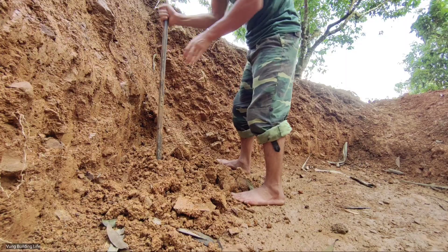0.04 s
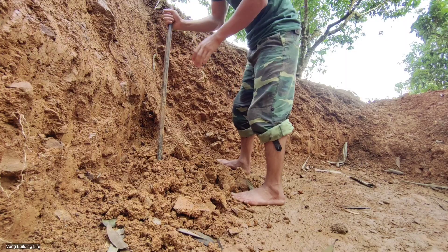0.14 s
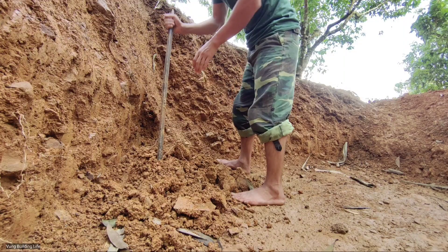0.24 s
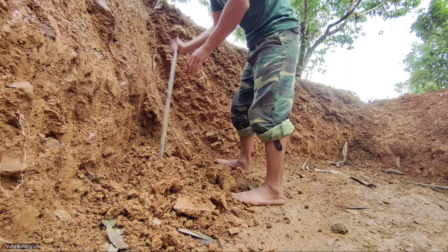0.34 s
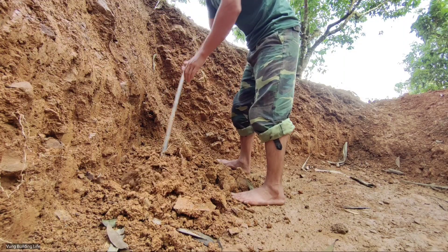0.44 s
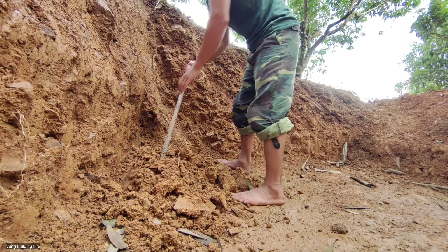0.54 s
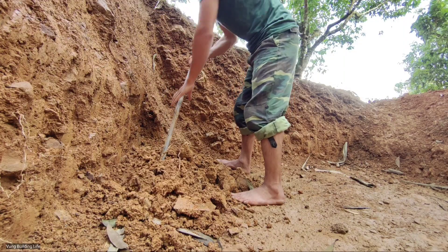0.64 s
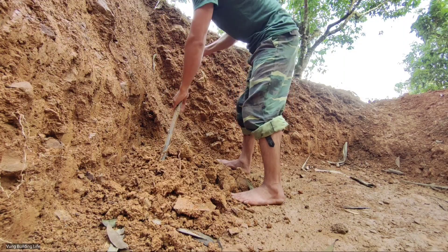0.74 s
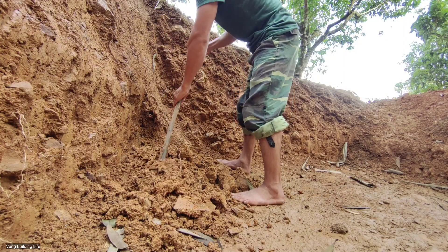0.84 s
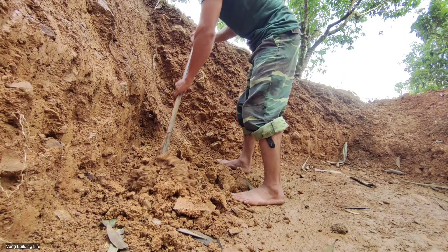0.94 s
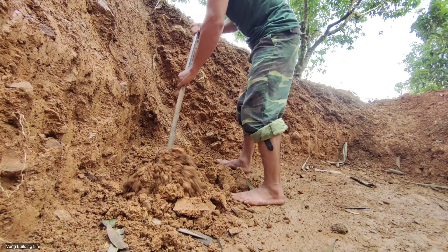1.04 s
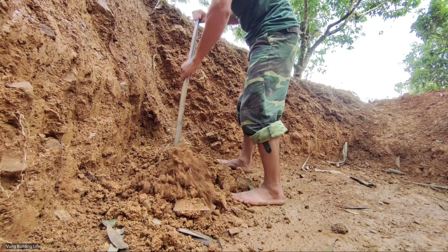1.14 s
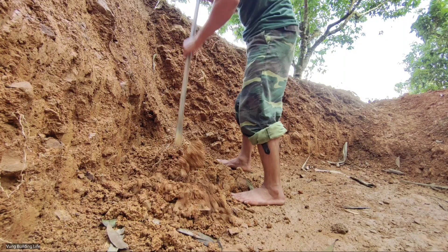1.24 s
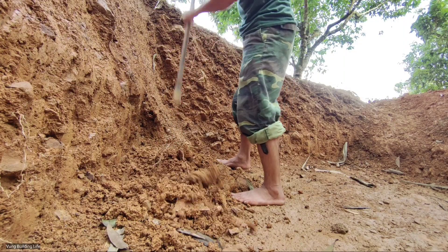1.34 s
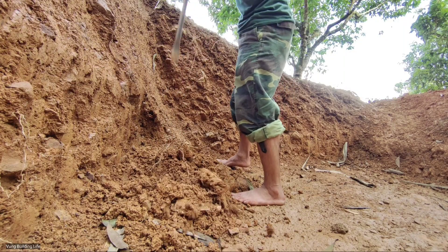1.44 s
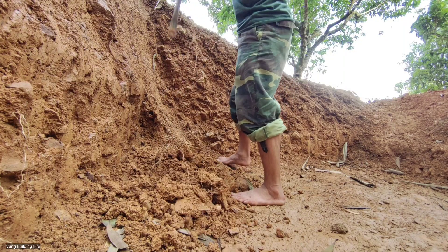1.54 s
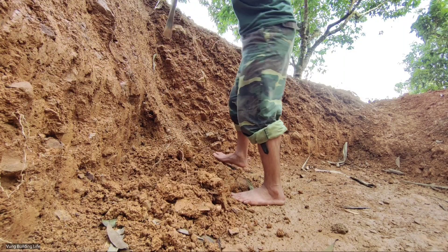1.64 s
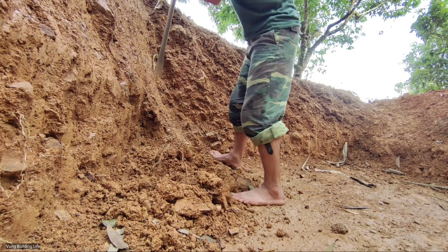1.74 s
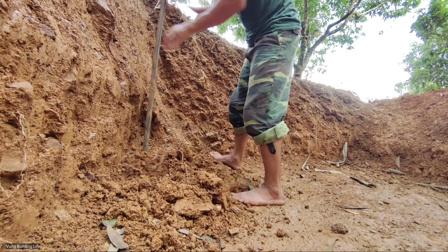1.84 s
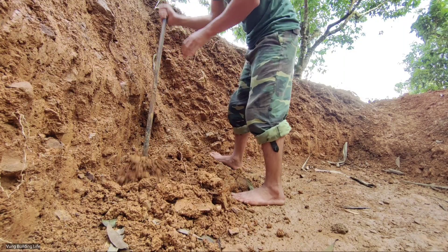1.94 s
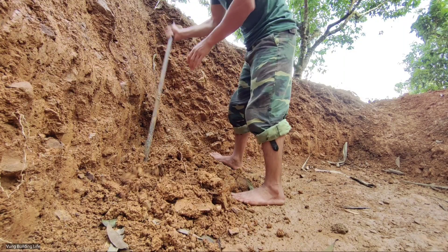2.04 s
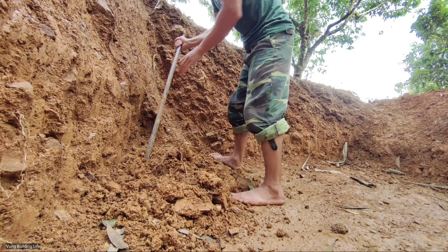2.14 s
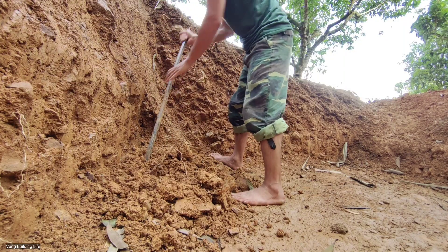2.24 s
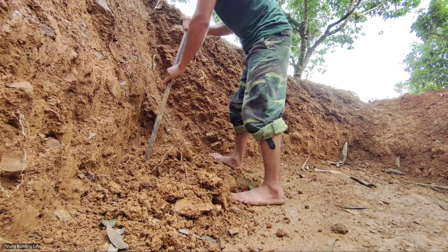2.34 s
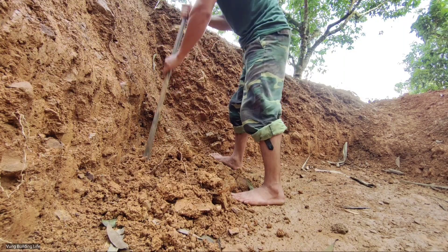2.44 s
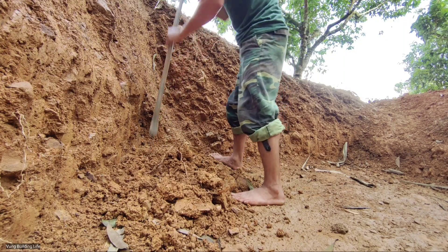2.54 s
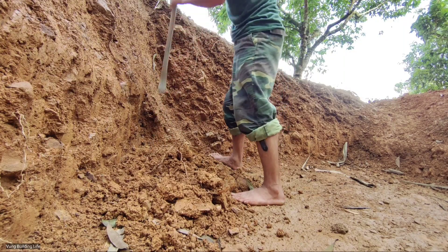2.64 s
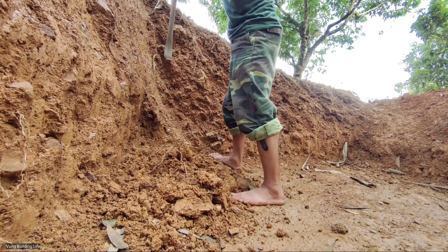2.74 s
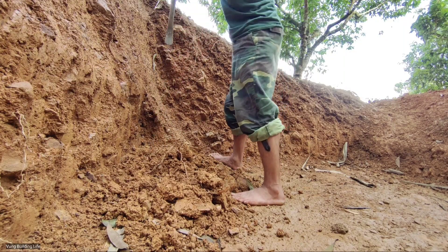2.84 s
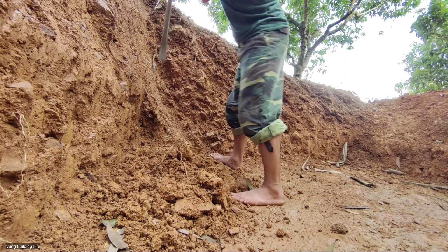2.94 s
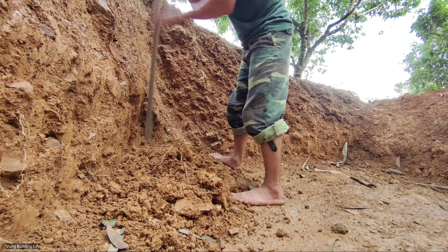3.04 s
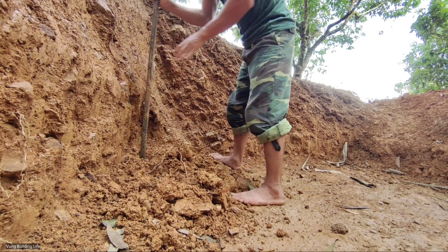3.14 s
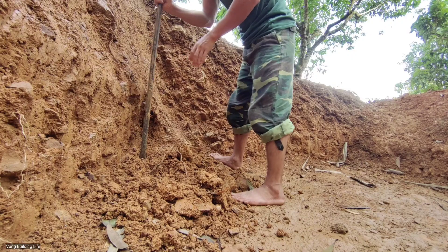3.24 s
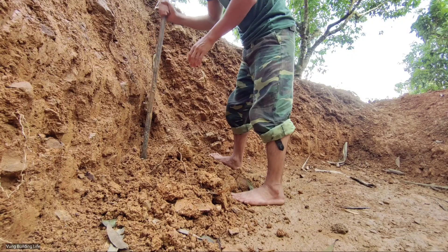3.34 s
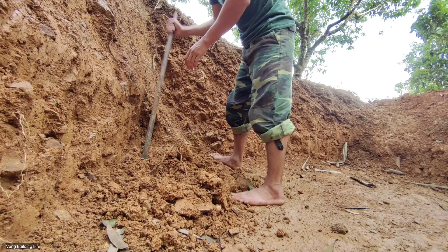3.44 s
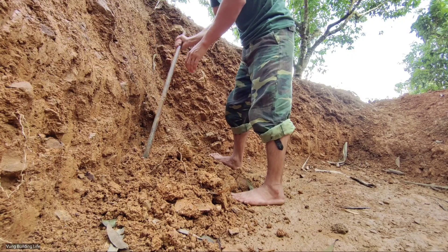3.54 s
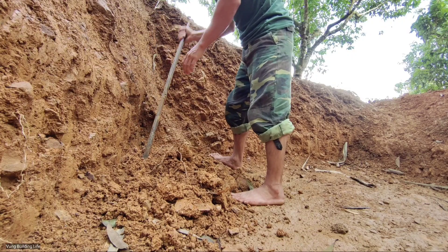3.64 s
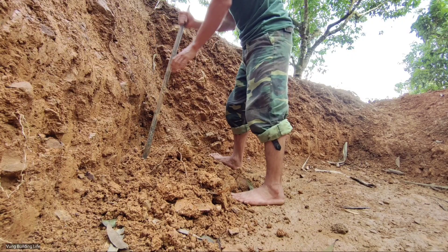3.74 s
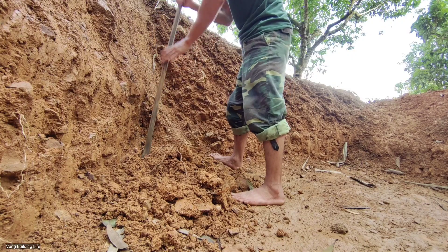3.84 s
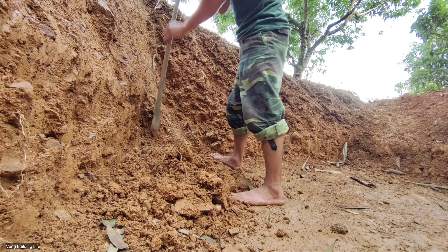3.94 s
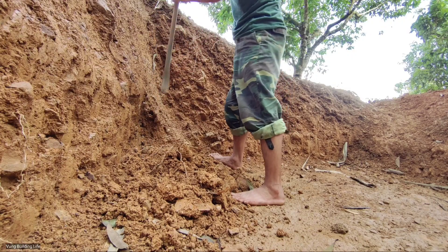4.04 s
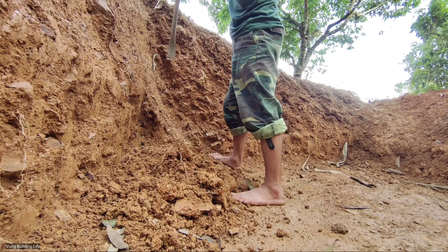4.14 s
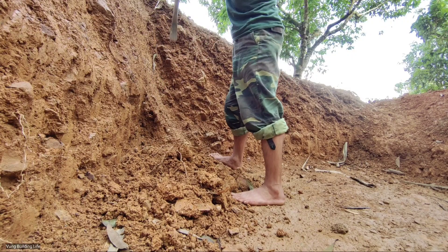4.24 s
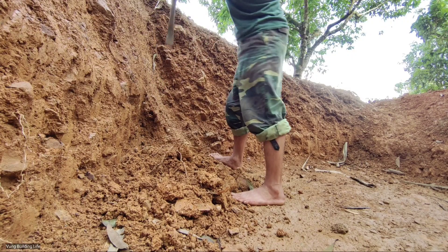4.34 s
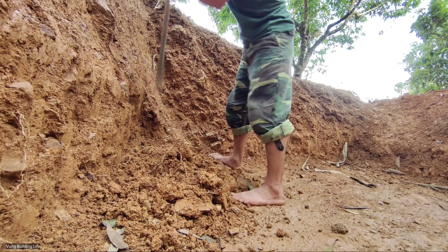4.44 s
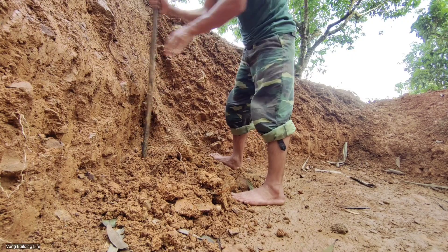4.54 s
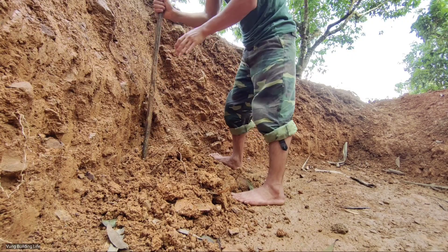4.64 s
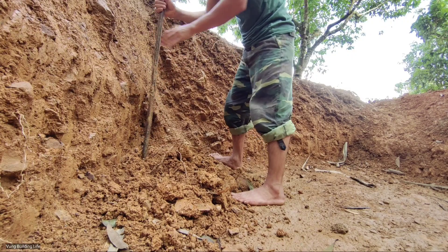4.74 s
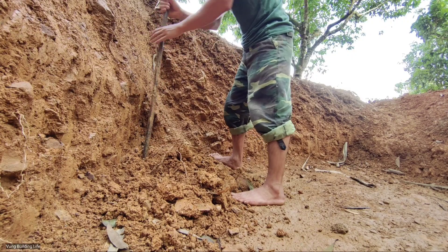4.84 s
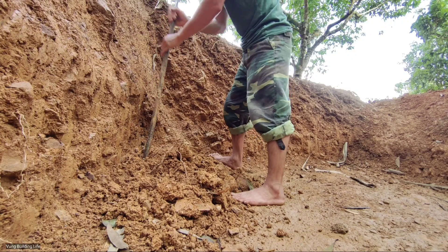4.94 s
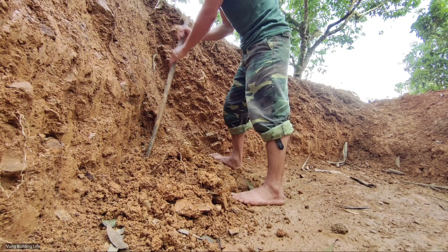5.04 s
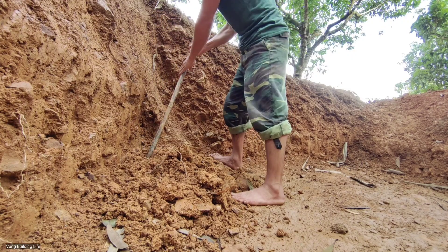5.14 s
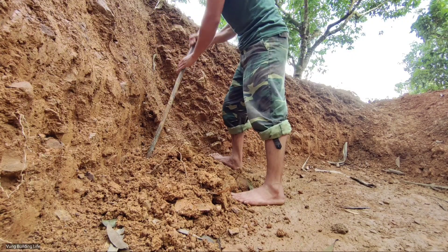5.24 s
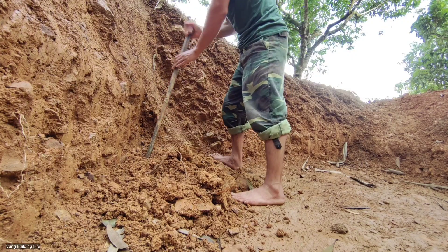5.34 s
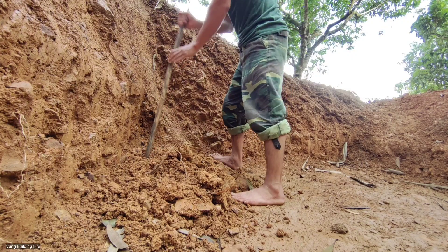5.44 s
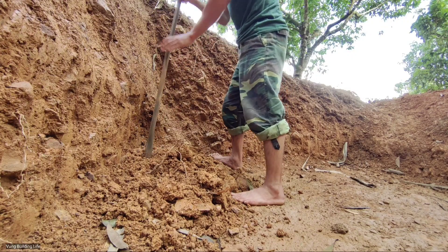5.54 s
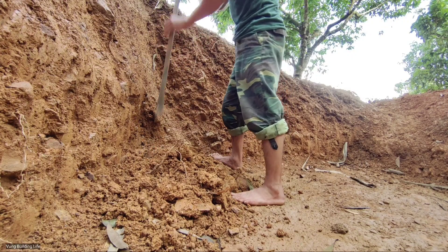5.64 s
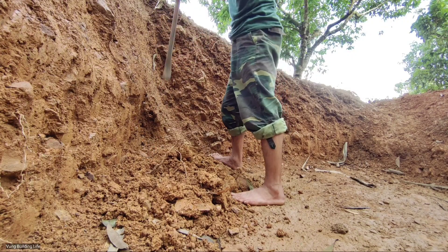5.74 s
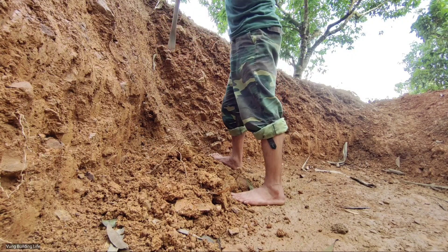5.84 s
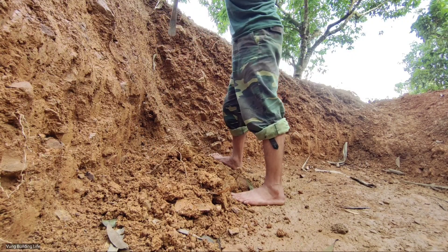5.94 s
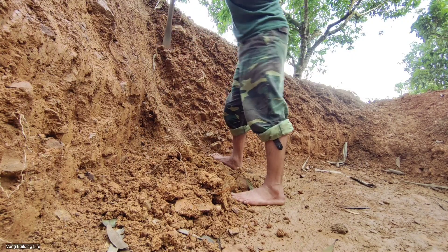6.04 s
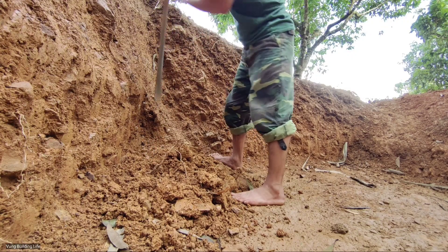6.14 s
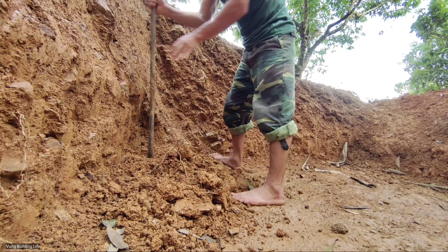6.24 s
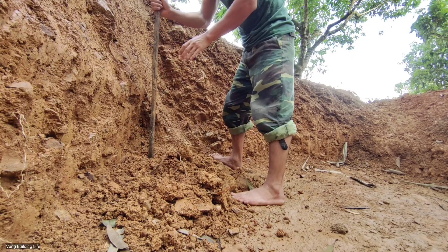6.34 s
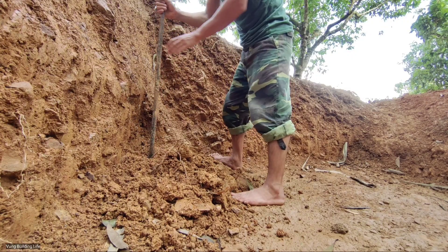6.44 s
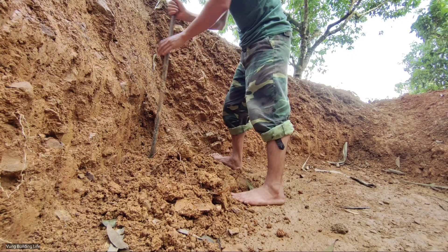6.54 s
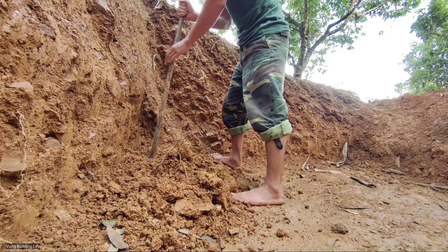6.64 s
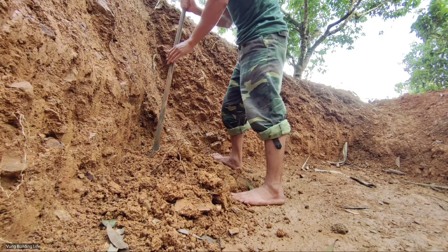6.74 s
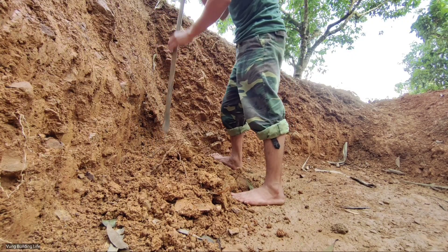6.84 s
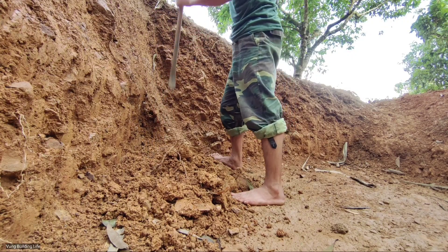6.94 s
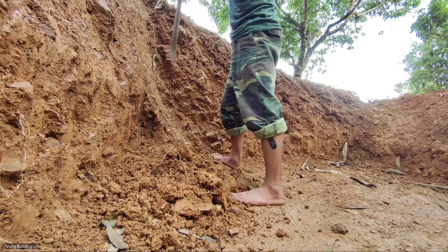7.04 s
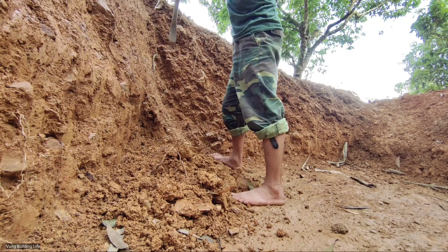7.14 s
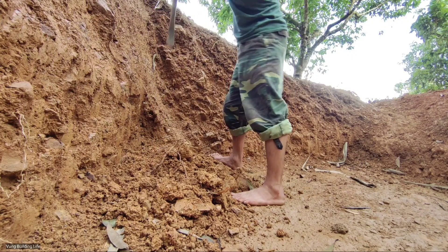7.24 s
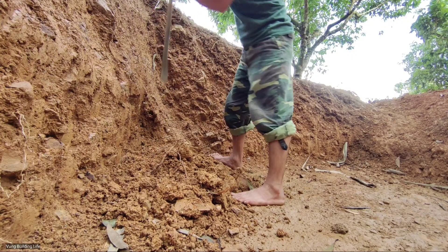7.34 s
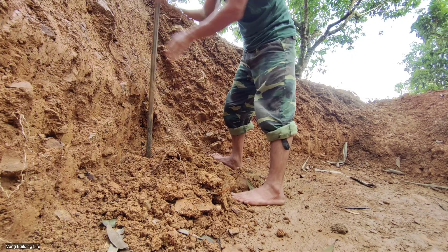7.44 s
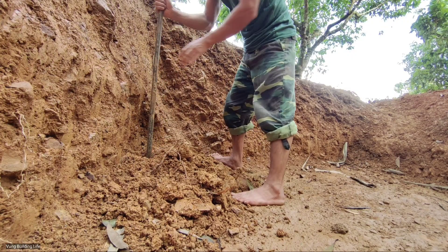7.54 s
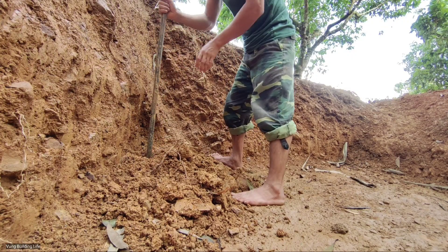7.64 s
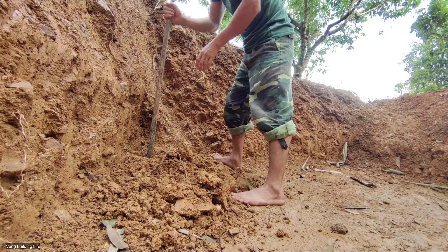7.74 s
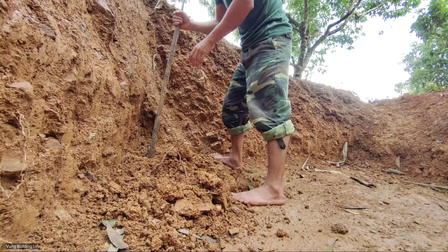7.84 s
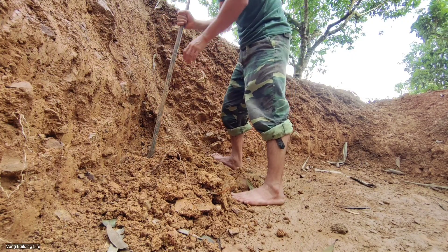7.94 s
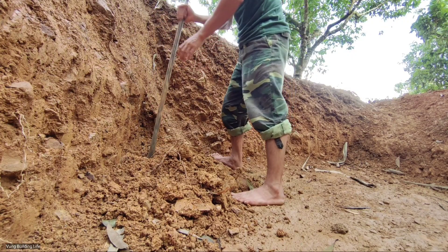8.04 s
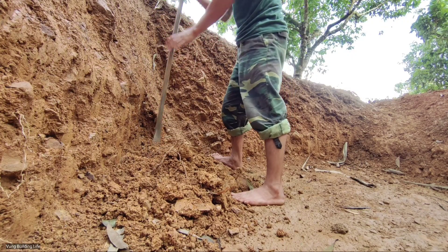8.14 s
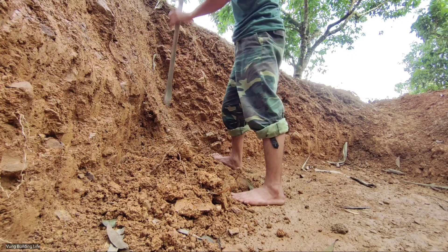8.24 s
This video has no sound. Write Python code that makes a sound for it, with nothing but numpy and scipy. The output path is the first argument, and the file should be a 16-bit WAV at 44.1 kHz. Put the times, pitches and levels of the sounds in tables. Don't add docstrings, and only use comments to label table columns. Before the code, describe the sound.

Close, dry strikes of a metal bar into an earth bank, followed by scraping, crumbling soil and pebble ticks, with distant insects outdoors.

```python
import sys
import numpy as np
from scipy import signal
from scipy.fft import rfft, irfft, next_fast_len
from scipy.io import wavfile
from scipy.ndimage import uniform_filter1d, map_coordinates

SR = 44100
rng = np.random.default_rng(int(sys.argv[2]) if len(sys.argv) > 2 else 0)


def to_linear_factor(level_db):
    exponent = np.asarray(level_db, float) / 20
    return 10 ** exponent


def wav_out(sig):
    wavfile.write(sys.argv[1], SR, np.round(np.clip(np.atleast_2d(sig).T, -1, 1) * 32767).astype(np.int16))


N = 364707
LAG, SHAFT_LAG = 8, 3


def unit(x):
    return x / np.sqrt(np.mean(x ** 2) + 1e-20)


def along(points, hz):
    f, v = np.transpose(points)
    return np.interp(np.log(hz + 1), np.log(f + 1), v)


def curves(rows):
    s, *cols = np.transpose(rows)
    return [np.interp(np.arange(N) / SR, s, c) for c in cols]


def filtered(x, response):
    n = x.shape[-1]
    m = next_fast_len(2 * (n // 2) + 4096, real=True) // 2 * 2
    return irfft(rfft(x, m) * response(np.fft.rfftfreq(m, 1 / SR)), m)[..., :n]


def causal(level_db):
    c = irfft(np.log(np.maximum(to_linear_factor(level_db), 1e-4)))
    half = len(c) // 2
    c[1:half] *= 2
    c[half + 1:] = 0
    return np.exp(rfft(c))


def resonances(modes):
    def response(f):
        total = 0
        for k, (centre, width, db) in enumerate(modes):
            damping = 1j * f * width
            total = total + (-1) ** k * to_linear_factor(db) * damping / (centre * centre - f * f + damping)
        return total
    return response


def bell_db(hz, centre_hz, width_oct):
    return -6 * (np.log2((hz + 1) / centre_hz) / width_oct) ** 2


def add(track, s, sound, lean_db, lag=LAG):
    for ch, (late, gain) in enumerate([(lag, to_linear_factor(lean_db / 2)), (0, to_linear_factor(-lean_db / 2))]):
        part = track[ch, round(s * SR) + late:][:len(sound)]
        part += gain * sound[:len(part)]


def strokes(s, hold_s, gain, swell_s, fade_s):
    t = np.arange(N // 128 + 2)[:, None] * 128 / SR
    before = (s - t) / np.maximum(swell_s, .003)
    after = (t - s - hold_s) / np.maximum(fade_s, .01)
    shape_db = -20 * np.maximum(before, after).clip(0, 9)
    power = ((gain * to_linear_factor(shape_db)) ** 2).sum(axis=1)
    return np.interp(np.arange(N) / SR, t[:, 0], np.sqrt(power))


def rush(spectrum, alike, patchy_db):
    z = signal.stft(rng.standard_normal((2, N)), nperseg=512)[2]
    field = uniform_filter1d(rng.standard_normal(z.shape[1:]), size=2, axis=0)
    field = uniform_filter1d(field, size=14, axis=1)
    pair = signal.istft(z * to_linear_factor(patchy_db * unit(field)), nperseg=512)[1][:, :N]

    def response(hz):
        turn = np.arccos(np.clip(along(alike, hz), -1, 1)) / 2
        return to_linear_factor(along(spectrum, hz)) * [np.cos(turn), np.sin(turn)]
    mid, side = filtered(pair, response)
    return unit(np.array([mid + side, mid - side]))


def burst(t60, spiky, colour_db, rise_s=1e-4, size=SR // 6):
    t = np.arange(size) / SR
    raw = rng.standard_normal(len(t)) * np.exp(spiky * rng.standard_normal(len(t)))
    raw *= to_linear_factor(-60 * t / max(t60, .004)) * (1 - np.exp(-t / rise_s))
    raw *= np.minimum(1, 2 - 2 * t / t[-1])
    out = filtered(raw, lambda hz: causal(colour_db(hz)))
    return out / np.abs(out).max()


def crumbs(count, spread_db, scatter, clump_db, lag=LAG):
    clumps_per_s = 45
    draw = rng.random((count, 4))
    at = (draw[:, 0] * (N - 64)).astype(int) + 32
    field = rng.standard_normal(N * clumps_per_s // SR + 4)
    clump = map_coordinates(field, [at * clumps_per_s / SR])
    size = to_linear_factor(-spread_db * np.log(draw[:, 1] + 4e-3) + clump_db * clump) * np.sign(draw[:, 2] - .5)
    late = np.round(lag + scatter * (draw[:, 3] - .5)).astype(int)
    return unit(np.array([np.bincount(at + late, size, N), np.bincount(at, size, N)]))


# t/s, insects/dB, breeze/dB
AIR_LEVELS = [
    (0.0, -68, -74.5),
    (0.94, -66, -74),
    (8.27, -67, -73.5),
]
# f/Hz, density/dB per Hz
INSECT_SPECTRUM = [(2060, -45.5), (3500, -9), (4220, -6), (4520, 6.5), (4800, 4.5), (5150, 7), (5920, -2),
                   (6550, -7), (7600, -41.5), (9880, -46.5), (16700, -120)]
RUMBLE_SPECTRUM = [(15, -30.5), (25, -3.5), (81, 3.5), (184, -8.5), (252, -1), (502, -18), (657, -12.5),
                   (900, -34.5), (1170, -46.5), (1980, -120)]
HISS_SPECTRUM = [(500, -58), (800, 3.5), (2500, -2.5), (4000, -7.5), (7700, -4.5), (11500, -8.5),
                 (15000, -4)]


def outdoors():
    insects_db, rumble_db = curves(AIR_LEVELS)
    chorus = to_linear_factor(insects_db + 4.5) * rush(INSECT_SPECTRUM, [(5000, 0.098)], patchy_db=4.5)
    rumble = to_linear_factor(rumble_db + 7.5) * rush(RUMBLE_SPECTRUM, [(60, 1.0), (290, 0.73), (800, .2)], patchy_db=5.0)
    hiss = to_linear_factor(-72.5) * rush(HISS_SPECTRUM, [(1000, 0.16)], patchy_db=4.0)
    return chorus + rumble + hiss


# f/Hz, width/Hz, level/dB
SINGERS = [
    (4600, 120, -78),
    (5190, 54, -71.5),
]


def singers():
    t, out = np.arange(N) / SR, 0

    def drift(rate_hz):
        return np.interp(t * rate_hz, np.arange(2000), rng.standard_normal(2000))
    for hz, width_hz, db in SINGERS:
        swell = to_linear_factor(db + 2.5 * drift(6.4))
        sine, cosine = np.sin(2 * np.pi * hz * t), np.cos(2 * np.pi * hz * t)
        out = out + swell * np.array([drift(width_hz) * sine + drift(width_hz) * cosine for _ in range(2)])
    return out


# f/Hz, level/dB, t60/s
PLANE_A = [(915, -8, .4), (1297, -8, .33), (1742, -6, .3), (2261, -3, .24), (2855, 0, .2), (3500, -2, .2),
           (4202, -3, .19), (4969, -5, .19), (5768, -5, .2), (6643, -7, .22), (7560, -14, .18),
           (8570, -12, .2), (9530, -14, .2), (10600, -16, .2)]
PLANE_B = [(969, -4, .45), (1416, -4, .4), (1943, -6, .3), (2535, 0, .26), (3198, -2, .25), (3957, -2, .24),
           (4770, -5, .25), (5642, -6, .25)]
OVERTONES = [(11670, -16, .2), (12800, -18, .2), (13810, -22, .2), (15080, -12, .2)]
# from/s, to/s
SEATED_SPANS = [
    (0, .1),
    (6.2, 6.5),
]
# t/s, level/dB, favoured f/Hz, second-plane share/0-1, t60/s
JOLTS = [(0.0005, -20.5, 5760, 0.5, 0.044), (.012, -26, 5900, 0.7, 0.1), (4.578, -39, 3850, .95, 0.081),
         (4.6, -38, 3020, 0.9, 0.063), (4.624, -40, 3700, 0.9, 0.08), (4.66, -41.5, 3600, 0.76, 0.1),
         (4.955, -55, 3900, 0.73, 0.16), (5.03, -46, 5570, 0.56, 0.25), (5.075, -43, 6600, 0.7, 0.14),
         (5.21, -49, 4180, 0.5, 0.37), (5.275, -47, 6700, 0.9, 0.5), (5.335, -46.5, 6550, 0.45, 0.21),
         (6.2048, -14, 6590, 0.2, 0.03), (6.233, -31, 4250, 0.3, 0.066), (6.311, -32.5, 6640, 0.37, 0.076),
         (6.331, -43, 4300, 0.5, 0.065), (6.352, -35, 4900, 0.44, 0.11), (6.371, -36, 6600, 0.1, 0.054),
         (6.4, -40, 5870, .05, 0.092), (6.414, -36.5, 5550, 0, 0.041), (6.452, -39, 6540, 0.18, 0.084),
         (6.479, -36.5, 6500, 0.4, 0.058), (6.504, -40.5, 6600, .05, 0.051),
         (6.521, -34.5, 6500, .05, 0.061), (6.546, -33.5, 6800, 0, 0.059), (6.586, -36, 6600, 0.2, 0.035),
         (6.613, -31.5, 6800, 0.1, 0.047), (6.677, -47, 6800, 0.44, .3), (8.019, -41, 5700, 0.15, 0.25),
         (8.022, -43.5, 4200, .02, 0.26)]


def jolts():
    out, t = np.zeros((2, N)), np.arange(SR // 6) / SR
    first = PLANE_A[3:] + OVERTONES
    second = PLANE_B[3:] + [(6560, -7, .2)]
    mode_hz, mode_db, _ = np.transpose(first + second)
    for s, db, hz, share, t60 in JOLTS:
        share = np.clip(share, .01, .99)
        weight = np.where(np.arange(len(mode_hz)) < len(first), 1 - share, share)
        seat_hz = 781 * any(a <= s < b for a, b in SEATED_SPANS)
        f = np.hypot(mode_hz, seat_hz)
        draw = rng.random((2, len(f)))
        focus_db = np.maximum(-24.5 * abs(np.log2(f / hz)), -22)
        size = weight * to_linear_factor(mode_db + focus_db + 6 * (draw[0] - .5))
        sound = size @ np.sin(2 * np.pi * (f[:, None] * t + draw[1][:, None]))
        decay = to_linear_factor(db + 3 - 60 * t / max(t60, .02)) * (1 - np.exp(-t / 0.0007))
        add(out, s, decay * sound, lean_db=-2.5, lag=SHAFT_LAG)
    return out


# f/Hz, width/Hz, level/dB
CLAY_MODES = [(121, 80, -10.5), (229.7, 35, 1.5), (296.6, 44, 1), (483.4, 103, 3), (745.3, 73, 1.2),
              (971, 110, -10)]


def thump(push_s, tilt_db=0):
    t = np.arange(SR // 6) / SR
    push = (1 + 1.67 * rng.standard_normal(len(t))) * to_linear_factor(-60 * t / push_s)
    modes = [(hz, width, db + tilt_db * np.clip(np.log2(hz / 400), 0, 1)) for hz, width, db in CLAY_MODES]
    out = filtered(push, resonances(modes))
    return out / np.abs(out).max()


# f/Hz, density/dB per Hz
CRACK_SPECTRUM = [(590, -33), (1000, -8.5), (1350, -9.5), (2710, -2.5), (3490, -9), (3870, -4.5),
                  (4700, -11), (6710, -2), (8250, -23), (10600, -28), (13200, -44), (15500, -22.5)]


def stab(out, s, crack_db, thump_db, t60, push_s, tilt_db=0):
    crack = burst(t60, 0.45, lambda hz: along(CRACK_SPECTRUM, hz), rise_s=0.0017)
    add(out, s, to_linear_factor(crack_db) * crack, lean_db=11.0)
    add(out, s, to_linear_factor(thump_db) * thump(push_s, tilt_db), lean_db=5.5)


# t/s, crack level/dB, thump/dB re crack, crack t60/s
LURCHES = [(.001, -22.5, -9.5, 0.031), (0.0101, -30, 7.5, 0.077), (0.033, -38.5, 10, 0.089),
           (1.828, -30.5, -7.5, 0.019), (1.837, -29.5, 1.5, 0.25), (1.8482, -19, -7.5, 0.026),
           (3.069, -35, -1, 0.056), (3.084, -10, -10, 0.0098), (4.5223, -27.5, -9.5, 0.053),
           (4.533, -18.5, 2, 0.0087), (6.193, -27.5, -6.5, 0.099), (6.213, -34, -10, .03),
           (6.2296, -27.5, 1.5, 0.06), (6.2444, -31, 4, 0.12), (7.456, -40, 1.5, 0.093),
           (7.472, -27, -17, 0.1)]


def lurches():
    out = np.zeros((2, N))
    for s, db, thump_db, t60 in LURCHES:
        stab(out, s, db + 2, db + thump_db - 3.0, t60, push_s=0.015)
    return out


# t/s, hold/s, sand level/dB, grit level/dB, 20 dB fade/s
SPILLS = [(.005, 0.013, -47.5, -47.5, 0.14), (0.361, 0.068, -69, -59, -0.2),
          (0.848, 0.64, -63.5, -58.5, 1.1), (1.224, 0.35, -56.5, -68.5, -0.9),
          (1.878, 0.21, -64.5, -54.5, -0.33), (2.409, 0.12, -67.5, -65, 0.03),
          (2.726, 0.015, -64.5, -69.5, 0), (2.999, 0.12, -63.5, -67.5, -4.5),
          (3.108, 0.026, -55, -48, 0.18), (3.164, 0.017, -64, -53, 0.35), (3.468, 0.077, -60, -59, -2.57),
          (3.701, 0.2, -68.5, -69.5, 1.3), (1.832, .005, -49, -53, 0.09), (4.52, 0.0033, -57, -63, -7.3),
          (4.548, 0.12, -61.5, -50, 0.21), (4.842, 0.29, -63, -59, -0.1), (5.236, 0.1, -69, -60.5, 0.67),
          (5.451, 0.036, -69, -75, 0.7), (6.308, 0.038, -52, -49.5, 0.35),
          (6.487, 0.092, -58.5, -57.5, 0.34), (6.94, 0.046, -73.5, -75, 0.3),
          (7.484, 0.027, -60, -54, 0.34), (7.765, 0.073, -66.5, -78, -1.8), (7.86, 0.13, -57.5, -57, -0.27)]
# f/Hz, density/dB per Hz
COARSE_SPECTRUM = [(600, -32.5), (1200, -5), (2200, 0), (3200, 2.5), (4200, 2.5), (5500, -20), (9000, -26)]
SAND_SPECTRUM = [(3000, -28), (5000, -8), (6600, 8), (7800, -15.5), (9500, -9), (11300, -32),
                 (15200, -11.5)]


def spills():
    grit = crumbs(count=40000, spread_db=3, scatter=8, clump_db=3)
    grit = unit(filtered(grit, lambda hz: causal(along(COARSE_SPECTRUM, hz))))
    sand = crumbs(count=40000, spread_db=3.5, scatter=12, clump_db=3)
    sand = unit(filtered(sand, lambda hz: causal(along(SAND_SPECTRUM, hz))))
    high_modes = [(hz, 40, db) for hz, db, _ in PLANE_A[6:] + OVERTONES]
    hum = crumbs(count=20000, spread_db=3, scatter=3, clump_db=3)
    hum = unit(filtered(hum, resonances(high_modes)))
    sand = 1.21 * sand + 0.25 * hum
    s, hold_s, sand_db, grit_db, fade_s = np.transpose(SPILLS)
    sand_gain = strokes(s, hold_s, to_linear_factor(sand_db + 3.5), 0.014, fade_s)
    grit_gain = strokes(s, hold_s, to_linear_factor(grit_db - 3.0), 0.014, fade_s)
    return sand_gain * sand + grit_gain * grit


# t/s, hold/s, level/dB, second-plane share/0-1, 20 dB fade/s
RUBS = [(0.006, 0.011, -43, 0, 0.0259), (1.892, 0.037, -47, 0.8, 0.0949), (2.406, 0.037, -51.5, 0.8, 0.03),
        (3.08, 0.069, -49, 0.33, 0.21), (3.494, 0.052, -73, 0, 12), (3.785, 0.013, -67, 0.56, 0.06),
        (4.554, 0.09, -49.5, 0.7, 0.04), (4.882, 0.32, -66.5, 1, -1.3), (5.458, 0.0096, -56.5, 0.6, 0.1),
        (6.273, 0.075, -49, 0.21, -0.52), (6.312, 0.12, -62, 0.4, 0.5), (7.496, 0.0099, -51, 0.67, 0.24),
        (7.999, 0.047, -57, 0.55, 0.07)]


def rubs():
    def held(plane, best_hz):
        modes = [(hz, 25 + .012 * hz, db - 8 * abs(np.log2(hz / best_hz))) for hz, db, _ in plane]
        contact = crumbs(count=20000, spread_db=3, scatter=3, clump_db=2, lag=SHAFT_LAG)
        return unit(filtered(contact, resonances(modes)))
    s, hold_s, db, share, fade_s = np.transpose(RUBS)
    share = np.clip(share, 0, 1)
    out = 0
    for part, hum in [(1 - share, held(PLANE_A, 4400)), (share, held(PLANE_B, 3400))]:
        out = out + strokes(s, hold_s, to_linear_factor(db + 3.5) * np.sqrt(part), .04, fade_s) * hum
    return out


# t/s, level/dB, f/Hz, t60/s
BOOMS = [(1.846, -24, 224, 0.083), (1.844, -22.5, 518, 0.071), (3.078, -21, 276, 0.061),
         (3.078, -27.5, 968, 0.083), (4.527, -22, 224, 0.12), (4.528, -16.5, 786, 0.039),
         (6.206, -33, 223.2, 0.33), (7.466, -18, 220, 0.11), (7.475, -33.5, 136, 0.11),
         (0.03, -25, 256, 0.056), (6.247, -19.5, 322, 0.028)]


def booms():
    out, t = np.zeros((2, N)), np.arange(SR // 6) / SR
    for s, db, hz, t60 in BOOMS:
        decay = to_linear_factor(db - 60 * t / t60) * (1 - np.exp(-t / 0.0021))
        add(out, s, decay * np.sin(2 * np.pi * hz * t), lean_db=7.0)
    return out


# t/s, hold/s, level/dB, 20 dB swell/s, depth/0-1
SCRAPES = [(0.297, 0.21, -69.5, 0.5, 0.85), (0.703, 0.036, -70, -2, 0), (0.947, 0.19, -58.5, -0.14, 0.77),
           (1.223, 0.18, -55, -0.26, 0.57), (2.389, 0.048, -58.5, 0.13, 0.88),
           (3.446, 0.078, -56.5, 0.2, 0.26), (5.033, 0.058, -50.5, 0.25, 0.76),
           (5.293, 0.058, -65, 1.54, 1), (5.468, 0.1, -64.5, -3.5, 0.96), (5.7, 0.072, -69.5, 0.5, 0.37),
           (6.572, 0.052, -54.5, 0.37, 0.5), (6.764, 0.17, -73.5, 1, 0.2), (7.874, 0.16, -67, 0.7, 0.89),
           (7.997, 0.014, -59, -0.33, 0.4)]
# f/Hz, width/Hz, level/dB
HOLLOW_MODES = [(250, 90, -8), (500, 60, -5), (720, 60, 0), (980, 60, -5)]


def scrapes():
    def hole(best_hz):
        modes = [(hz, width, db - 11 * abs(np.log2(hz / best_hz))) for hz, width, db in HOLLOW_MODES]
        contact = crumbs(count=20000, spread_db=3.5, scatter=3, clump_db=4)
        return unit(filtered(contact, resonances(modes)))
    shallow, deep = hole(750), hole(450)
    s, hold_s, db, swell_s, depth = np.transpose(SCRAPES)
    depth = np.clip(depth, 0, 1)
    out = 0
    for part, sound in [(1 - depth, shallow), (depth, deep)]:
        out = out + strokes(s, hold_s, to_linear_factor(db - 2.5) * np.sqrt(part), swell_s, 0.088) * sound
    s, db = np.transpose([row[:2] for row in BLOWS])
    settle = strokes(s + 0.0068, 0.067, to_linear_factor(db - 59.5), .01, 0.07)
    return out + settle * (shallow + deep)


# f/Hz, density/dB per Hz
GRIT_SPECTRUM = [(530, -28.5), (900, -11), (1750, -7), (2100, -1), (3710, -1), (4080, -6.5), (6650, 3),
                 (7960, -16), (9400, -6), (11100, -30), (15500, -23)]


def lump(out, s, db, thump_db, t60, tilt_db, lean_db):
    snap = burst(t60, 0.44, lambda hz: along(GRIT_SPECTRUM, hz) + tilt_db * np.log2((hz + 100) / 4000))
    add(out, s, to_linear_factor(db) * snap, lean_db)
    add(out, s, to_linear_factor(db + thump_db - 1.5) * thump(0.044, tilt_db=-1.0), lean_db)


# t/s, peak level/dB, thump/dB re peak, t60/s
CLODS = [(0.3475, -42.5, -14.5, 0.0081), (0.9021, -26.5, -10, 0.038), (1.0109, -33, -14, 0.099),
         (1.0628, -38, -19, 0.046), (1.1845, -34, -10.5, 0.1), (1.234, -34, -11, 0.04),
         (1.293, -28, -39, 0.013), (1.398, -39, -15, 0.036), (1.5229, -34.5, -27, 0.054),
         (1.5448, -35, -39, 0.069), (4.643, -59, 14.5, 0.025), (6.329, -67, 14, 0.057),
         (7.572, -61, 20, 0.044), (5.4385, -43.5, 8.5, 0.36), (5.456, -42.5, 12, 0.031)]


def clods():
    out = np.zeros((2, N))
    for s, db, thump_db, t60 in CLODS:
        lump(out, s, db, thump_db, t60, tilt_db=-5, lean_db=-3.1)
    return out


# t/s, peak level/dB, brightness/dB per octave, t60/s
SNAPS = [(0.8351, -28.5, 3, 0.004), (2.0374, -35, 8, 0.028), (2.371, -37, 1, 0.18),
         (2.9864, -42, 4.5, 0.027), (3.4693, -47.5, -2, 0.039), (7.7591, -39.5, 6.5, 0.06),
         (7.857, -35, 3.5, 0.0081), (7.863, -40.5, 5.5, .027), (7.8873, -36, 13, 0.023),
         (7.899, -30.5, 7, 0.056)]


def snaps():
    out = np.zeros((2, N))
    for s, db, tilt_db, t60 in SNAPS:
        lump(out, s, db, -18, t60, tilt_db, lean_db=-4)
    return out


# t/s, peak level/dB, centre f/Hz, t60/s
TICKS = [(1.0633, -37.5, 6500, 0.015), (1.2432, -36, 5770, .02), (1.258, -30.5, 5860, 0.023),
         (1.278, -34.5, 6100, .03), (1.2985, -36, 5840, .02), (1.321, -38, 5900, .015),
         (1.326, -39, 5760, .015), (1.331, -40, 6340, 0.013), (1.348, -38, 4930, 0.02),
         (1.363, -38, 6130, .015), (1.377, -37, 6400, .015), (1.396, -36, 5860, .02),
         (1.412, -36, 5900, .015), (1.425, -39, 5930, .015), (1.438, -39.5, 6000, 0.014),
         (1.4495, -40.5, 6050, 0.018), (1.4588, -37.5, 6200, 0.036), (1.497, -54, 6400, 0.013),
         (1.524, -30.5, 6050, 0.03), (1.532, -38, 6340, .02), (1.546, -38, 6100, .02),
         (1.6084, -41, 6050, 0.26), (7.7618, -35.5, 6380, 0.024), (7.782, -47, 6300, 0.027),
         (7.815, -45, 6340, .015), (7.839, -42, 6200, 0.044), (7.8578, -24, 6400, 0.0044),
         (7.915, -44, 6260, .02), (.968, -44, 497, 0.082), (1.022, -41.5, 514, 0.028),
         (1.272, -49, 880, 0.031), (1.304, -50, 3230, .03), (1.402, -62, 1080, 0.032),
         (1.468, -42, 2020, 0.054), (1.505, -49, 1220, 0.14), (1.56, -49, 1790, 0.23),
         (2.0385, -38, 14200, .03), (3.4716, -40, 6060, 0.028), (5.009, -48.5, 440, 0.16),
         (5.052, -47, 755, 0.12), (5.088, -46.5, 520, 0.063), (6.605, -45, 740, 0.053),
         (7.995, -49, 14600, 0.47)]


def pebbles():
    out = np.zeros((2, N))
    for s, db, hz, t60 in TICKS:
        tick = burst(t60, 0.14, lambda f: bell_db(f, hz, 0.18), size=SR // 11)
        add(out, s, to_linear_factor(db - 2.5) * tick, lean_db=-3)
    return out


# t/s, peak level/dB, centre f/Hz, width/octaves, t60/s
SLIDES = [(1.255, -36, 1520, 1.2, 0.8), (1.385, -39, 1500, 1.1, 0.65), (1.602, -45, 2250, 1.4, 0.18),
          (2.402, -48, 280, 0.53, 0.15), (2.426, -39, 4300, 0.59, 0.053), (4.841, -40, 3220, 0.3, 0.12),
          (7.562, -39, 2570, 1.08, 0.1), (8.003, -38, 770, 1.97, 0.23)]


def slides():
    out = np.zeros((2, N))
    for s, db, centre_hz, width_oct, t60 in SLIDES:
        slide = burst(t60, 0.46, lambda hz: bell_db(hz, centre_hz, width_oct), rise_s=0.0048)
        add(out, s, to_linear_factor(db) * slide, lean_db=-6.0)
    return out


def ring(hz, focus_db, share, place, rise_s, damping):
    t = np.arange(SR // 5) / SR
    share = np.clip(share, .01, .99)
    out = np.zeros(len(t))
    for plane, weight in [(PLANE_A, 1 - share), (PLANE_B, share)]:
        for order, (f, db, t60) in enumerate(plane, start=4):
            reach = weight * (0.027 + abs(np.sin(np.pi * order * place)))
            grip_db = (t / .028) ** 2 * min(f / 3000, 1)
            chatter_db = 2.5 * np.interp(t, np.linspace(0, .25, 24), rng.standard_normal(24))
            decay_db = 60 * damping * t / t60
            level_db = db - focus_db * abs(np.log2(f / hz)) - decay_db - grip_db + chatter_db
            out += reach * to_linear_factor(level_db) * np.sin(2 * np.pi * (f * t + rng.random()))
    return out * (1 - np.exp(-t / rise_s))


# t/s, crack level/dB, thump/dB re crack, crack t60/s, thump brightness/dB per octave
BLOWS = [
    (1.843, -5.5, -8, 0.01, 7.5),
    (3.0787, -7, -10, 0.03, 1.5),
    (4.5279, -8, -6, 0.026, 19),
    (6.2043, -6, -5.5, 0.02, 4),
    (7.467, -9, 0, 0.011, 14),
]


def blows():
    out = np.zeros((2, N))
    for s, db, thump_db, t60, tilt_db in BLOWS:
        stab(out, s, db - 4, db + thump_db - 3.0, t60, push_s=0.013, tilt_db=tilt_db)
        ring_db = db - 9.5 - 348.5 * t60
        add(out, s, to_linear_factor(ring_db) * ring(2700, 13, 1.0, 0.01, 0.0045, damping=6.8), lean_db=13.5)
    return out


# f/Hz, width/Hz, level/dB
SEATINGS = [
    [(2820, 110, -2), (3820, 290, 0), (5460, 290, -9), (6660, 140, -3)],
    [(2730, 140, 0), (4240, 140, -2), (5910, 100, -5), (6640, 220, 0)],
    [(2640, 150, -3), (3190, 200, -2), (3920, 140, 0), (6540, 160, -8)],
    [(3230, 96, -1), (4280, 130, -1), (5160, 110, 0), (5970, 120, -4)],
    [(3220, 99, -1), (3780, 120, 0), (5310, 380, -10), (6240, 88, -3)],
]


def clanks():
    out, t = np.zeros((2, N)), np.arange(SR // 10) / SR
    for (s, db, *_), modes in zip(BLOWS, SEATINGS):
        sound = 0
        for hz, width_hz, level_db in modes:
            sound = sound + to_linear_factor(level_db) * np.exp(-np.pi * width_hz * t) * np.sin(2 * np.pi * hz * t)
        add(out, s, to_linear_factor(db - 7) * (1 - np.exp(-t / .0015)) * sound, lean_db=8)
    return out


# t/s, level/dB, favoured f/Hz, second-plane share/0-1, place along bar/0-1
KNOCKS = [(2.371, -30, 6520, 0.2, 0.96), (2.385, -32, 3710, 0.15, 0.73), (2.417, -49, 1370, 0.38, .11),
          (3.69, -39.5, 6200, 0.05, 0.4), (3.765, -36, 3900, 0.63, 0.44), (3.764, -57, 940, 0.6, .12),
          (5.039, -56, 1360, 0.62, .1), (5.276, -42, 1040, 0.78, 0.01), (5.456, -35.5, 1350, 0.5, 0.02),
          (5.461, -24.5, 6700, 0.71, 0.34), (6.538, -37, 6740, 0, 0.5), (6.612, -47, 3240, 0.02, 0.29),
          (8.02, -33, 2730, 0.06, 0.42)]


def knocks():
    out = np.zeros((2, N))
    for s, db, hz, share, place in KNOCKS:
        focus_db = 5 + 35 * max(np.log2(hz / 2050), 0)
        sound = ring(hz, focus_db, share, place, 0.0033, damping=0.63)
        add(out, s, to_linear_factor(db) * sound, lean_db=-4.5, lag=SHAFT_LAG)
    return out


# f/Hz, t60/s
PIT_DECAY = [(200, 0.32), (1000, 0.14), (4000, 0.039), (12000, 0.059)]


def pit(x):
    hz, t, z = signal.stft(rng.standard_normal((2, SR // 4)), SR, nperseg=256)
    tail = signal.istft(z * to_linear_factor(-60 * t / along(PIT_DECAY, hz)[:, None]), SR, nperseg=256)[1]
    late = np.pad(x, ((0, 0), (130, 0)))
    return signal.fftconvolve(late, tail / np.linalg.norm(tail[0]), axes=1)[:, :N]


def scene():
    steady = outdoors() + singers() + spills() + rubs() + scrapes()
    work = jolts() + lurches() + booms() + clods() + snaps() + pebbles() + slides()
    work = work + blows() + clanks() + knocks()
    return work + to_linear_factor(-15.5) * pit(work) + steady


# f/Hz, left minus right/dB
PORT_BALANCE = [(1500, 0), (3000, -2.5), (4500, -6.5), (6200, -19), (7000, -19.5), (7800, -4.5), (11000, 7),
                (13500, -7), (15500, -14.5)]


def ports(hz):
    ratio = to_linear_factor(along(PORT_BALANCE, hz)) ** 2
    shelf = np.where(hz < 15650, 1, to_linear_factor(-38.5)) * (1j * hz / (42 + 1j * hz)) ** 2
    left = shelf * causal(10 * np.log10(2 * ratio / (1 + ratio)))
    right = shelf * causal(10 * np.log10(2 / (1 + ratio)))
    return [left, right]


def band_limit(x):
    return signal.sosfilt(signal.butter(12, 16300, fs=SR, output="sos"), x)


def record(dry):
    heard = filtered(dry, ports)
    heard = heard / (1 + abs(heard / .66) ** 4) ** (1 / 4)
    return band_limit(heard)


dry = scene()
out = record(dry)
wav_out(out)
```